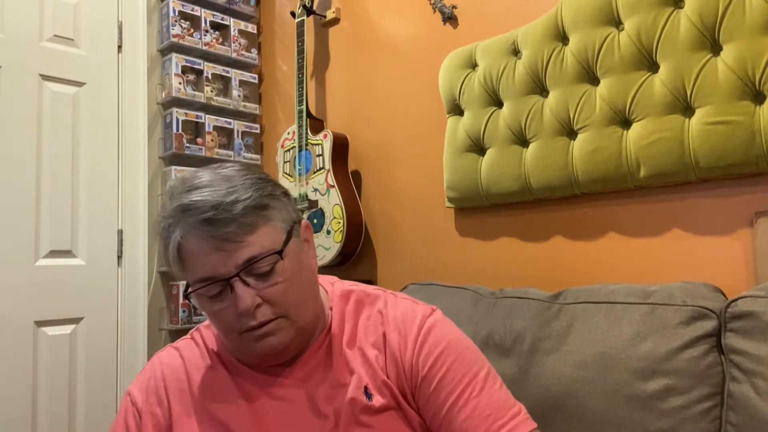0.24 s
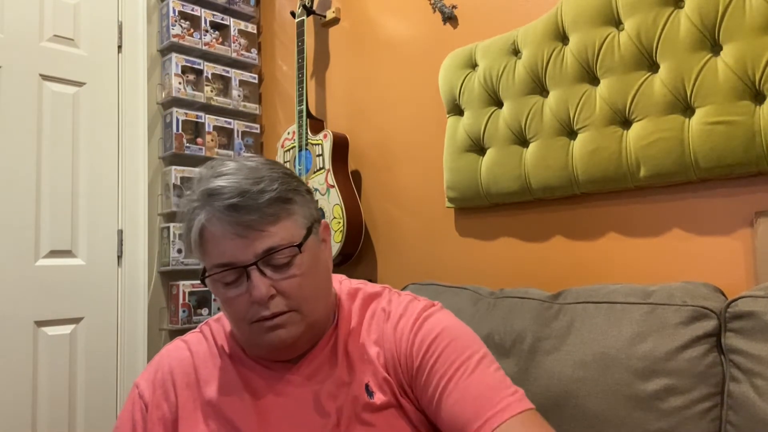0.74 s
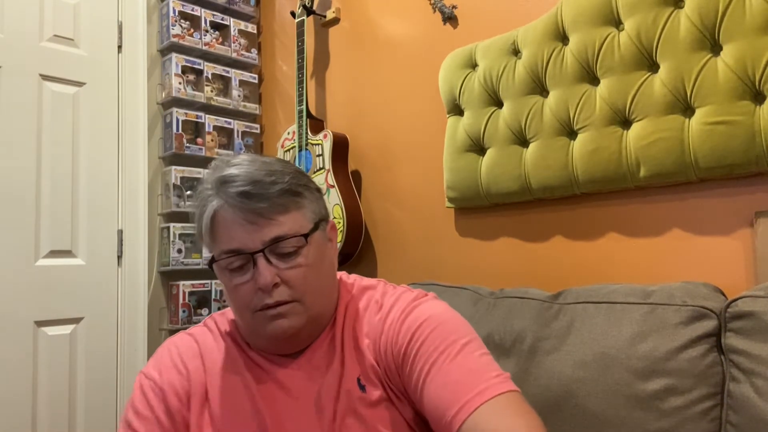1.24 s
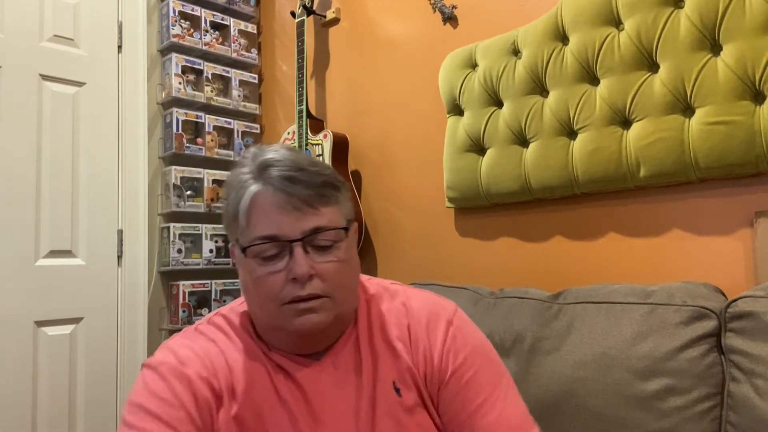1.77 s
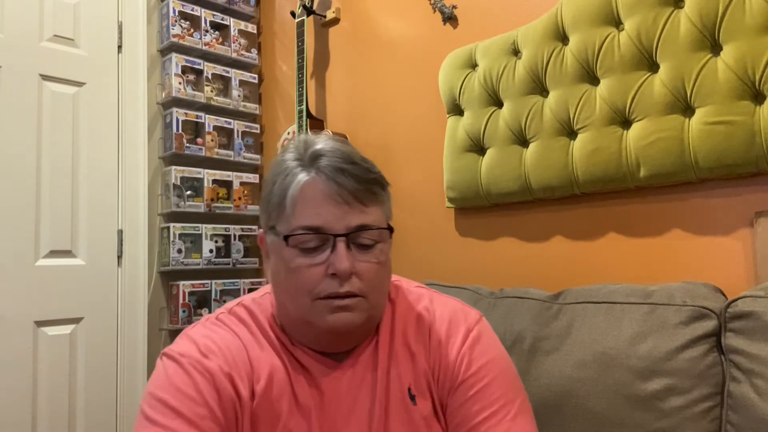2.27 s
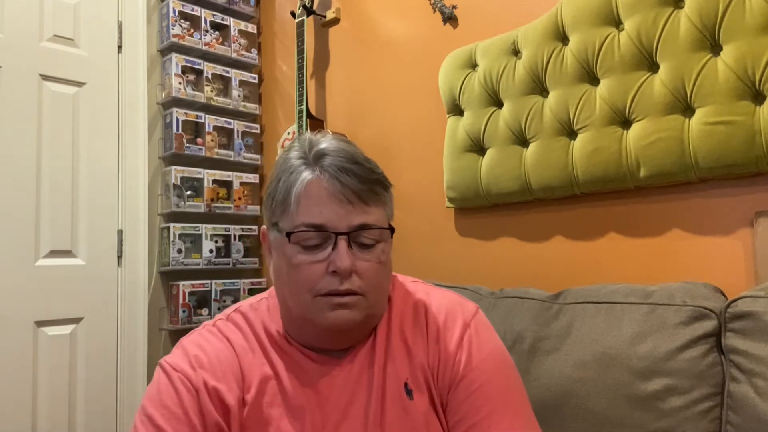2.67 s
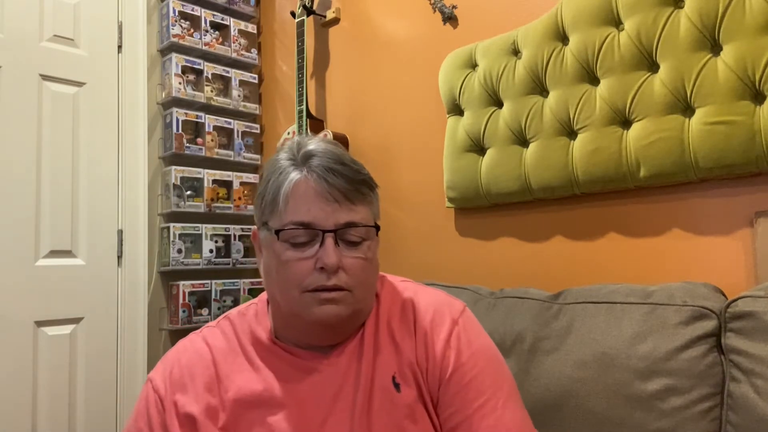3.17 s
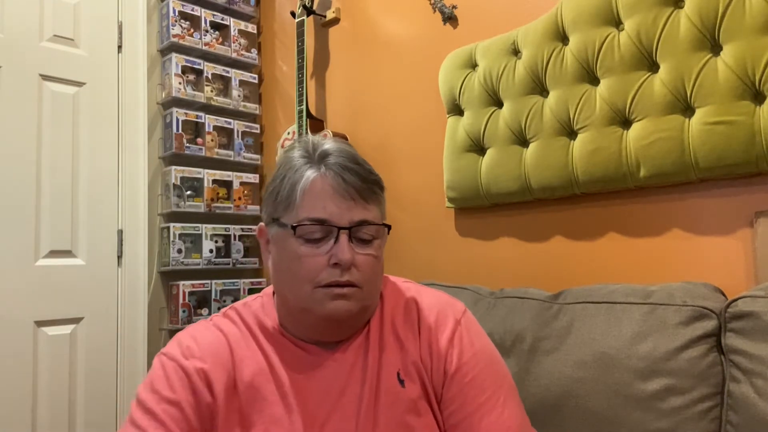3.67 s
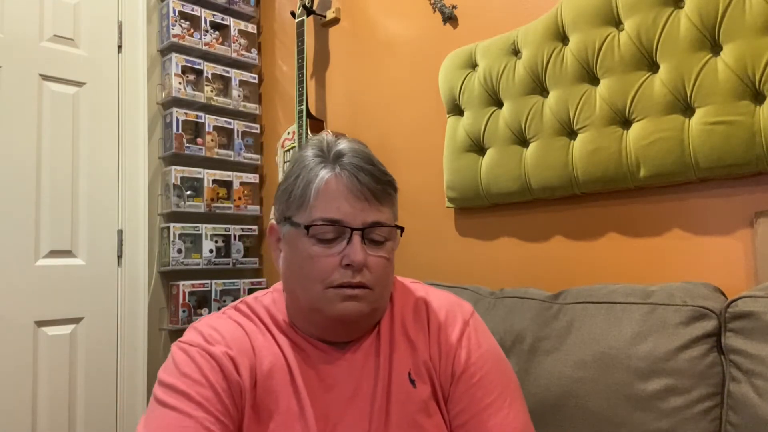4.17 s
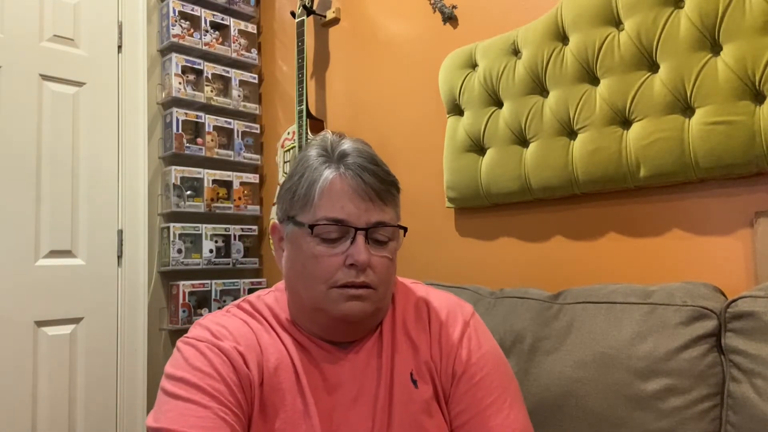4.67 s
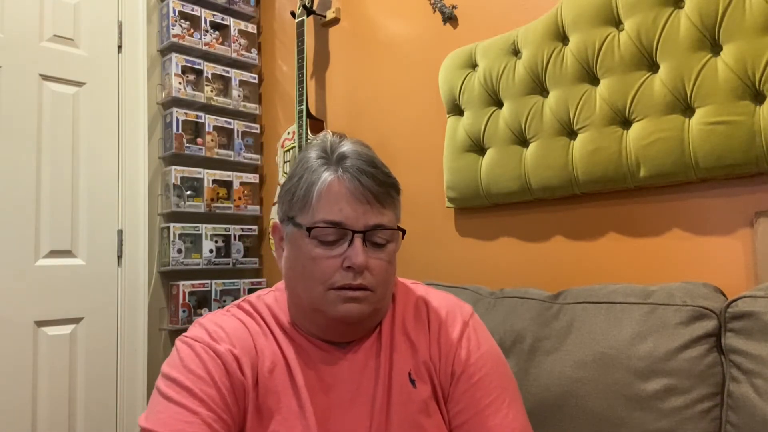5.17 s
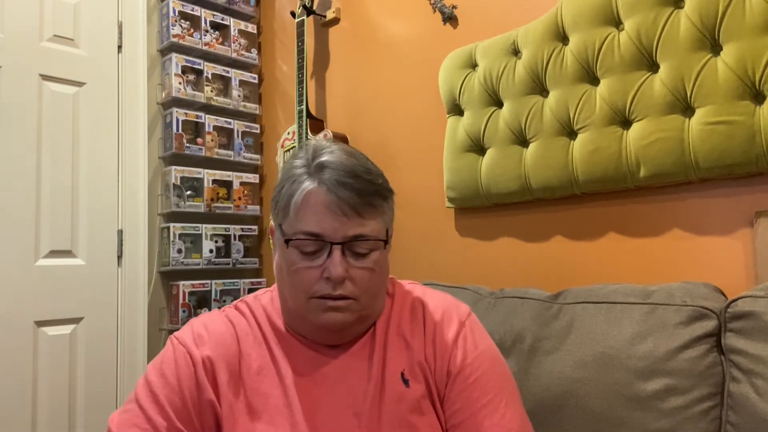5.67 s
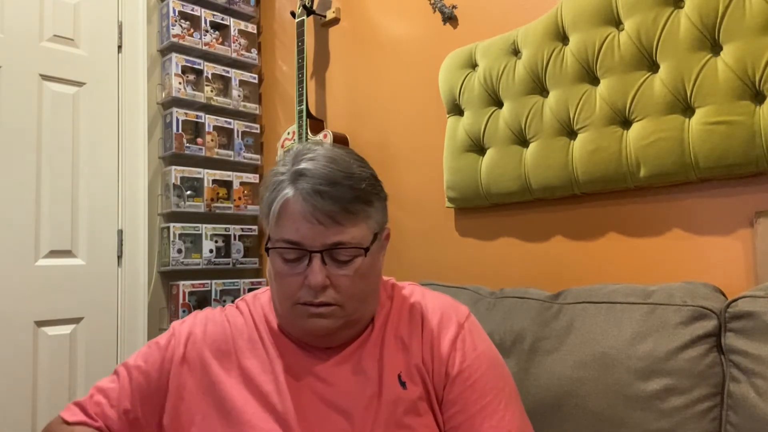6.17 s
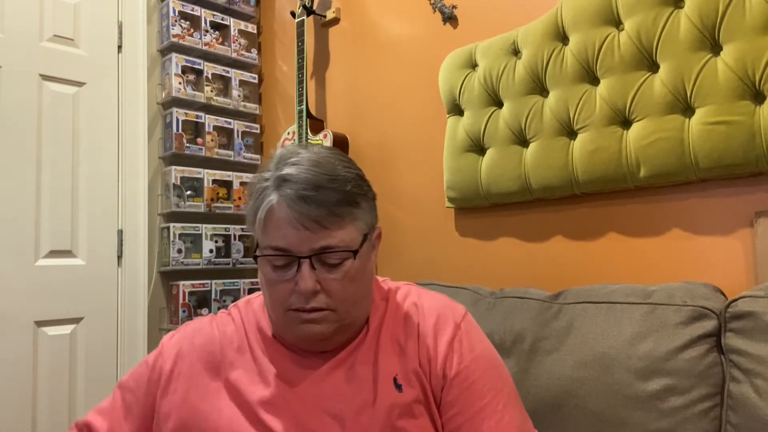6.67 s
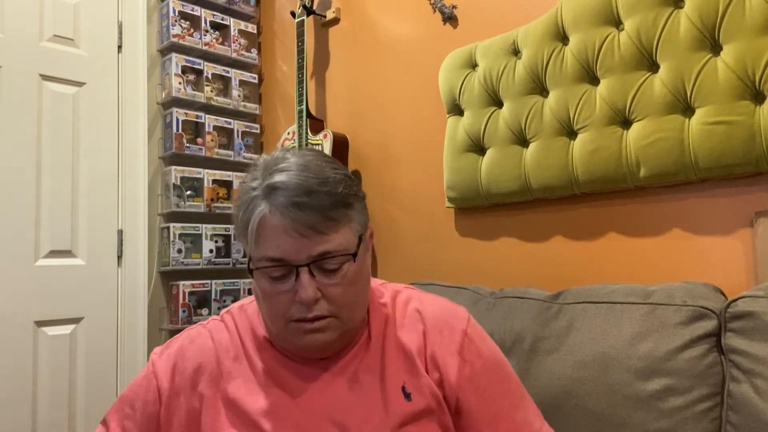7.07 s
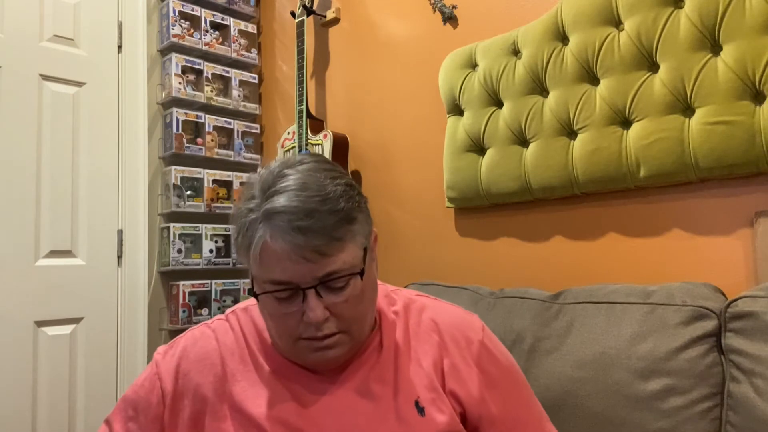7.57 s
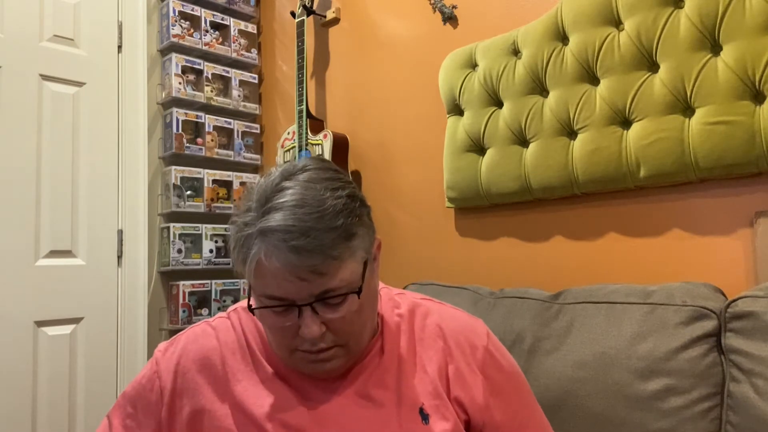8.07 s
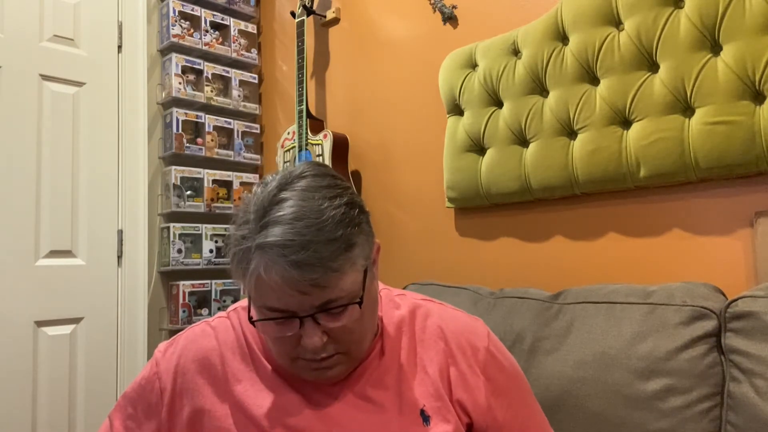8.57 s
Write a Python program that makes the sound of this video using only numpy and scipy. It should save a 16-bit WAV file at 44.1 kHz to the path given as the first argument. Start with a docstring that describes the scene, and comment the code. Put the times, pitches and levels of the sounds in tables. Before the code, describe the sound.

In a small furnished room, hands slide and tap lightly on a cardboard box for about five seconds over a faint low hum. Then packing tape tears away in one loud, crackling pull, the hollow box drumming and jerking beneath it, and lets go with a hard snap and brief flap rattle. Softer rustles and a cluster of cardboard knocks follow. Close stereo microphone, short dry room.

```python
"""Opening a taped cardboard box

Hands slide over a box and knock on it in a small furnished room, then the packing tape tears in one long pull
and lets go with a snap; afterwards the flaps are handled, over a low hum. Tearing and sliding are made of
many tiny random clicks, filtered and passed through resonances. Knocks, jerks and the snap ring the box's
own tones, tape cracks are short noise bursts, and random echoes make the room."""
import sys
import numpy as np
from scipy import signal
from scipy.fft import rfft, irfft, next_fast_len
from scipy.io import wavfile

SR = 44100
rng = np.random.default_rng(int(sys.argv[2]) if len(sys.argv) > 2 else 0)


def materialize(psi):
    """Save the field psi as 16-bit PCM at rate SR to the path in sys.argv[1].

    A 1-D psi becomes a single channel; in a 2-D psi each row is a channel.
    """
    bounded = np.clip(np.atleast_2d(psi).T, -1, 1)
    quanta = np.round(bounded * 32767).astype(np.int16)
    wavfile.write(sys.argv[1], SR, quanta)


N = 389844
TIME = np.arange(N) / SR
RING_TIME = TIME[:SR // 2]
HAND_TIME = TIME[::20]   # coarse time steps for hand movements

# The long pull on the tape. Each row: time in seconds, tearing effort in dB, boom of the lid in dB.
PULL = [(5.04, -41, -80), (5.12, -6, -51), (5.25, -6.5, -47.5), (5.42, -5, -50), (5.47, -3.5, -41.5),
        (5.68, -5, -40.5), (5.8, -0.5, -35), (5.94, 0, -37), (6.05, -1.5, -42), (6.16, -1.5, -51),
        (6.22, -8.5, -62.5), (6.34, -6.5, -67.5), (6.39, -20, -67), (6.5, -24, -62.5)]
# Fingers and flaps knocking on the box. Each row: start in seconds, peak of the body of the knock in dB,
# pitch of the contact in Hz, hardness from 0 to 1, pitch of the clack in Hz.
KNOCKS = [(0.284, -47.5, 1010, 1, 1440), (0.553, -42.5, 355, 1, 1440), (0.582, -43.5, 128, 0.77, 1190),
          (0.979, -45, 400, 0.6, 1000), (1.278, -45, 258, 0.36, 900), (1.346, -50, 380, 0.9, 1300),
          (1.48, -41, 650, 0.74, 1350), (1.625, -42.5, 368, .6, 1100), (1.874, -40, 194, 0, 800),
          (2.158, -45, 550, 0.5, 1000), (2.383, -41, 255, 0.63, 650), (2.446, -41.5, 855, 0.88, 1360),
          (2.579, -44, 700, 0.89, 1230), (2.839, -38.5, 227, 0.67, 600), (2.8895, -27, 317, 0.73, 1350),
          (2.912, -36.5, 340, 0.57, 900), (2.936, -42, 410, 0.8, 900), (3.468, -43, 243, 0.55, 596),
          (3.631, -44.5, 274, 0.62, 605), (3.654, -51, 220, 0.6, 600), (3.998, -51, 330, 0.3, 700),
          (4.105, -45, 226, 0.5, 1110), (4.143, -47, 320, 0.26, 900), (4.165, -48.5, 403, 0.76, 850),
          (4.22, -51.5, 388, 0.87, 1400), (4.244, -51.5, 400, 0.9, 1400), (4.293, -44, 606, .75, 1320),
          (4.319, -52, 400, 0.6, 900), (4.343, -52, 396, .65, 900), (4.36, -48, 400, 0.4, 900),
          (4.377, -52, 330, 0.8, 900), (4.482, -52, 330, 0.6, 600), (4.539, -53, 330, 0.2, 600),
          (4.7, -43.5, 374, 0.27, 705), (4.941, -38, 397, .9, 1450), (6.247, -36, 674, 0.5, 1100),
          (6.33, -28, 425, 0.72, 1410), (6.9104, -45, 1400, 0.9, 1990), (7.337, -43, 258, 0.85, 1250),
          (7.47, -39, 280, 0.72, 1000), (7.516, -42, 300, 0.7, 900), (7.552, -38, 260, .6, 950),
          (7.611, -39, 373, 0.67, 950), (7.698, -41, 370, 0.4, 800), (7.714, -38.5, 400, 0.59, 1100),
          (7.73, -40.5, 203, 0.1, 900), (7.83, -43.5, 280, 0.78, 900), (7.842, -55, 500, 1, 1100),
          (7.869, -38.5, 300, 0.74, 900), (7.906, -42, 280, 0.8, 980), (7.956, -39, 405, 0.69, 880),
          (8.391, -36, 352, 0.77, 1030)]
# Colour of the sideways sound. Each row: frequency in Hz, level in dB.
WIDTH = [(60, -0.5), (250, -3), (600, 3), (1500, 2), (2700, 11), (6000, 6.5), (7500, 7), (9000, -23.5),
         (16000, -26.5)]


def from_db(db):
    """Turn decibels into a gain."""
    return 10 ** (np.asarray(db) / 20)


def rms_one(x):
    """Scale to an rms (average strength) of 1."""
    return x / np.sqrt(np.mean(x ** 2) + 1e-20)


def peak_one(x):
    """Scale to a peak of 1."""
    return x / np.abs(x).max()


def gain_at(points, hz):
    """Read the gain of a colour table at the given frequencies."""
    at, db = np.transpose(points)
    return from_db(np.interp(np.log(hz + 1), np.log(at), db))


def colour(x, points):
    """Filter to the given spectrum without any sound before its cause (minimum phase)."""
    size = 8192
    cepstrum = irfft(np.log(gain_at(points, np.fft.rfftfreq(size, 1 / SR))))
    # folding the second half onto the first puts the response as early as possible
    cepstrum[1:size // 2] *= 2
    cepstrum[size // 2 + 1:] = 0
    response = irfft(np.exp(rfft(cepstrum)))[:size // 2]
    return signal.oaconvolve(x, response)[:len(x)]


def band(x, hz, kind, order=2):
    """Keep one range of frequencies with a Butterworth filter."""
    return signal.sosfilt(signal.butter(order, hz, kind, fs=SR, output="sos"), x + 1e-18)


def drift(per_s):
    """Wander by chance with an rms of 1, through per_s random points a second."""
    knots = rng.standard_normal(N // 20)
    return rms_one(np.interp(TIME * min(per_s, SR / 21), np.arange(len(knots)), knots))


def add(track, s, sound):
    """Mix a sound into the track at time s."""
    start = int(s * SR)
    track[start:start + len(sound)] += sound[:N - start]


def slips(per_s, spread_db, clump_db, clumps_per_s):
    """Fibres and glue threads let go: clicks of uneven size whose loudness swells in clumps."""
    born = rng.random(N) < per_s / SR
    sizes_db = spread_db * np.minimum(rng.exponential(1, N), 5)
    sizes = from_db(sizes_db) * rng.choice([-1, 1], N)
    return born * sizes * from_db(clump_db * drift(clumps_per_s))


def resonance(x, hz, width_hz):
    """Ring a resonance whose centre follows the curve hz, scaled to an rms of 1."""
    # shift the centre down to 0 Hz, smooth there, then shift back up
    turn = np.exp(2j * np.pi * np.cumsum(hz) / SR)
    smooth = signal.lfilter([1], [1, -np.exp(-np.pi * width_hz / SR)], x / turn)
    return rms_one((turn * smooth).real)


def tearing():
    """The tape gives way thread by thread; the same slips crackle in the film and drum on the box."""
    # How the voices follow the effort, in the order box drone, panel bark, strip rasp, tape fizz.
    # Each row: level in dB at an effort of 0 dB (before any lid share), dB of change per dB of effort.
    voices = [(-38.5, 0.46), (-44, 0.47), (-48, 3), (-45, 0.78)]
    # Colours of the box's deep boom, its drone and its bark, and of the tape's fizz.
    # Each row: frequency in Hz, level in dB.
    boom_colour = [(30, -43.5), (110, -20), (190, -5), (265, 4.5), (360, 6.5), (450, -8), (700, -13.5),
                   (2000, -55)]
    drone_colour = [(30, -25.5), (65, -3), (100, 4), (165, 1), (260, -4.5), (400, -7.5), (500, 5.5),
                    (690, 0.5), (780, 0.5), (900, -15.5), (1300, -17), (2500, -36.5)]
    bark_colour = [(700, -30.5), (920, -9.5), (1130, 3), (1400, 4), (1600, 1), (1780, -4), (2000, -1),
                   (3000, -4.5), (6000, -11.5)]
    fizz_colour = [(1200, -2.5), (2200, -1), (3200, -2.5), (4500, -0.5), (6500, -4.5), (8000, -1),
                   (11000, -2), (13000, -5.5), (15500, -7)]
    s, effort_db, boom_db = np.transpose(PULL)
    effort, boom_gain = (np.interp(TIME, s, from_db(db), left=0, right=0) for db in (effort_db, boom_db))
    drone_gain, bark_gain, rasp_gain, fizz_gain = (from_db(db) * effort ** slope for db, slope in voices)

    tugs = slips(per_s=600, spread_db=1.5, clump_db=1.5, clumps_per_s=160)
    threads = slips(per_s=5100, spread_db=2.0, clump_db=2.0, clumps_per_s=110)
    film = rms_one(tugs) + from_db(5) * rms_one(threads)   # fine threads 5 dB above the coarse tugs
    panels = signal.oaconvolve(tugs, box_ring(scatter_db=3))[:N]
    boom, drone, bark = (rms_one(colour(panels, shade)) for shade in (boom_colour, drone_colour, bark_colour))
    rasp, fizz = strip_ring(tugs), rms_one(colour(film, fizz_colour))

    # drone and bark also follow 0.32 of the lid's boom in dB, fading as the tear moves off the lid
    on_lid = peak_one(boom_gain) ** 0.32
    on_box = boom_gain * boom + on_lid * (drone_gain * drone + bark_gain * bark)
    return on_box + rasp_gain * rasp + fizz_gain * fizz


def strip_ring(x):
    """The free strip lengthens and flexes during the pull, so its resonances wander, swell and fade."""
    # Resonances of the stretched strip of tape. Each row: middle frequency in Hz, average level in dB.
    strip = [(1400, 1), (1800, 5), (2180, -3), (2700, -4), (3060, 0.5), (3500, -3.5), (4100, 2), (4500, -1),
             (4980, -0.5), (5900, -9.5)]
    width_hz, wander_share, sway_db = 115, 0.016, 4
    out, pull = np.zeros(N), slice(int(PULL[0][0] * SR), int(PULL[-1][0] * SR))
    for hz, db in strip:
        centre_hz = hz * (1 + wander_share * drift(13)[pull])
        level = from_db(db + sway_db * drift(25)[pull])
        out[pull] += level * resonance(x[pull], centre_hz, width_hz)
    return out / out[pull].std()


def box_ring(scatter_db, bending_s=0.003036):
    """The box answers a tap; bending waves carry the treble first, so the pitch drops at once."""
    # Tones of the air inside and of the panels. Each row: frequency in Hz, average level in dB,
    # time to fade by 60 dB in seconds.
    modes = [(102.5, -3.5, 0.085), (169, -26.5, 0.043), (262.8, -6.5, 0.043), (309.3, -7, 0.047),
             (358.4, -5, 0.036), (434.6, -9.5, .05), (492.6, -6.5, 0.055), (619, -2, 0.035),
             (655, -10.5, 0.058), (912, -11.5, 0.05), (1052, -12.5, 0.044), (1362, -3, 0.018),
             (1516, -1.5, .025), (1767, -4.5, 0.027)]
    hz, db, t60 = np.transpose(modes)[:, :, None]
    t = RING_TIME[:SR // 5]
    strength_db = db + scatter_db * rng.standard_normal(hz.shape)
    # bending_s is the delay of a 300 Hz tone; higher tones start earlier
    age = np.maximum(t - bending_s * np.sqrt(300 / hz), 0)
    return np.sum(from_db(strength_db - 60 * age / t60) * np.sin(2 * np.pi * hz * age), axis=0)


def blows(rows, bending_s, scatter_db, crumple_db, crumple_s, clack_s, crackle_db, crackle_s, body_spread):
    """A broad push thumps the air in the box; a hard edge makes the panel under it clack and crackle."""
    out = np.zeros(N)
    clack_spread = 1.313   # a clack spans this ratio above and below its pitch
    crunch_per_s = 700     # corrugations giving way under a blow
    for s, db, contact_hz, thump_db, clack_db, clack_hz in rows:
        ring = peak_one(box_ring(scatter_db, bending_s))
        t = TIME[:len(ring)]
        body_band = [contact_hz / (1 + body_spread), contact_hz * (1 + body_spread)]
        clack_band = [clack_hz / clack_spread, clack_hz * clack_spread]
        # the corrugations crunch briefly under the blow, and a few give way one by one
        crunchy = ring + from_db(crumple_db) * rng.standard_normal(len(t)) * np.exp(-t / crumple_s)
        gives_way = rng.random(len(t)) < crunch_per_s / SR
        buckles = rng.standard_normal(len(t)) * gives_way * np.exp(-t / crackle_s)

        thump = peak_one(band(ring, [55, 135], "band"))
        body = peak_one(band(crunchy, body_band, "band"))
        clack = peak_one(band(crunchy * np.exp(-t / clack_s), clack_band, "band"))
        clack += from_db(crackle_db) * peak_one(band(buckles, clack_band, "band"))
        add(out, s, from_db(db) * (body + from_db(thump_db) * thump + from_db(clack_db) * clack))
    return out


def snap():
    """The last strand parts, and the flaps spring free and rattle as a run of blows."""
    # Blows before colouring. Each row: start in seconds, peak of the body in dB, pitch of the contact in Hz,
    # thump in dB against that peak, clack in dB against that peak, pitch of the clack in Hz.
    rows = [(6.522, -35.5, 480, -14.5, -11, 1500), (6.5465, -8.5, 586, -24.5, -15.5, 1200),
            (6.5525, -20.5, 1046, -20, 7.5, 1850), (6.556, -18, 475, 0, -12.5, 1000),
            (6.574, -26.5, 590, -12, -15, 900), (6.59, -29, 480, -15.5, -10, 1004),
            (6.622, -37.5, 453, -15, -13, 900)]
    # Colour of the force. Each row: frequency in Hz, level in dB.
    force = [(30, -11.5), (70, -1.5), (150, 4.5), (280, 1), (500, 1.5), (650, 1), (950, 3), (1400, -2.5),
             (1800, 5.5), (2600, -12.5), (8000, -13)]
    rattle = blows(rows, bending_s=0.00092, scatter_db=7.5, crumple_db=-16.0, crumple_s=0.014,
                   clack_s=0.017, crackle_db=-14.5, crackle_s=0.025, body_spread=0.38)
    return colour(rattle, force)


def shudder(rise_s=0.0048, decay_s=0.039):
    """After the snap the loose flaps chatter against the box and settle: a noise burst that dies away."""
    # Colour of the chatter. Each row: frequency in Hz, level in dB.
    chatter_colour = [(30, -16), (70, 6), (160, 2.5), (260, -1.5), (480, -1), (700, -4.5), (1050, -1.5),
                      (1500, -14), (2500, -15), (6000, -24)]
    out = np.zeros(N)
    chatter = rms_one(colour(rng.standard_normal(len(RING_TIME)), chatter_colour))
    envelope = np.exp(-RING_TIME / decay_s) * (1 - np.exp(-RING_TIME / rise_s))
    add(out, 6.556, from_db(-28.5) * chatter * envelope)
    return out


def jerks():
    """The tape catches and jerks the lid, each time striking the box's tones."""
    # Each row: start in seconds, peak of the body in dB, pitch of the contact in Hz,
    # clack in dB against that peak.
    catches = [(5.116, -34.5, 350, -14), (5.132, -42, 445, -1), (5.263, -42, 395, 2),
               (5.284, -30.5, 220, -9), (5.345, -36.5, 380, -13.5), (5.434, -33, 458, -12),
               (5.46, -38, 477, -1), (5.505, -33.5, 520, -11), (5.552, -32, 383, -8),
               (5.592, -28.5, 252, -14), (5.718, -27, 317, -19), (5.753, -24, 336, -9),
               (5.795, -17, 305, -14.5), (5.817, -19, 290, -13), (5.862, -23, 321, -22),
               (5.927, -21, 337, -14), (5.948, -22.5, 323, -15)]
    thump_db, clack_hz = -24, 1590
    rows = [(s, db, hz, thump_db, clack_db, clack_hz) for s, db, hz, clack_db in catches]
    return blows(rows, bending_s=0.00338, scatter_db=0.0, crumple_db=0.0, crumple_s=0.012,
                 clack_s=0.002, crackle_db=-5, crackle_s=0.015, body_spread=0.26)


def by_hardness(soft_and_hard_db, hardness):
    """Pick a level between that of a soft and that of a hard blow."""
    return np.interp(hardness, [0, 1], soft_and_hard_db)


def knocks():
    """Fingers and flaps knock on the box; soft ones thump more and hard ones clack more."""
    thump_db, clack_db = (3.5, -14.5), (-30.5, 4.5)   # soft and hard, against the peak of the body
    rows = [(s, db, hz, by_hardness(thump_db, hardness), by_hardness(clack_db, hardness), clack_hz)
            for s, db, hz, hardness, clack_hz in KNOCKS]
    return blows(rows, bending_s=0.00203, scatter_db=7.0, crumple_db=-4, crumple_s=0.024,
                 clack_s=0.0027, crackle_db=-7.5, crackle_s=0.018, body_spread=0.38)


def crack_events():
    """List the single cracks, and the crack that each knock sets off in the tape."""
    # Tape film cracking. Each row: start in seconds, level in dB, lower treble in dB, top treble in dB;
    # cracks() adds a fixed trim to the level and to the top treble.
    single = [(0.2265, -56, -7, -2), (0.2857, -44, 5.5, -10), (0.302, -46, 6, -5), (0.529, -50, -10, 0),
              (0.5528, -35.5, -6, 2.5), (0.5829, -38, -7, -0.5), (1.08, -48, -2, -4),
              (4.7277, -50, -3.5, -32), (4.9388, -33, -12, -6), (4.9848, -42.5, -6, -7),
              (5.46, -38, -6, -5), (5.55, -55, -10, -1), (5.573, -51, -14, 1), (6.884, -57, -12, 5),
              (6.33, -28, -3, -7.5), (6.4558, -49, 0.5, -21), (6.5476, -14, -16, -6),
              (6.5526, -16, -8, -15), (6.7075, -41.5, -5, -14), (6.9094, -53, 4.5, 2),
              (7.3367, -41, -4.5, -14), (7.715, -52, 3, 1), (7.757, -49, -6, -5), (7.7766, -44.5, -8, -7),
              (7.8228, -43, -8, -9), (7.8445, -48.5, -1, -8), (7.907, -54, -7, -10),
              (7.9227, -48.5, -6, -4), (8.0596, -56, -7.5, -5)]
    soft_and_hard_db, low_db, top_db = (-27, -16), -0.5, -7   # the first against the peak of the knock
    knocked = [(s, db + by_hardness(soft_and_hard_db, hardness), low_db, top_db)
               for s, db, _, hardness, _ in KNOCKS]
    return single + knocked


def cracks(decay_s=0.00084, flutter_db=-19, flutter_s=0.0095, rise_s=0.0011):
    """The stiff film cracks in about a millisecond and flutters a little after."""
    # Colour of a crack. Each row: frequency in Hz, level in dB.
    crack_colour = [(600, -15.5), (1500, -12), (2800, -9), (4000, -8), (5800, 7.5), (7200, 4), (9000, 3.5),
                    (12000, -2), (16000, -2)]
    out, t = np.zeros(N), RING_TIME[:SR // 20]
    fading = np.exp(-t / decay_s) + from_db(flutter_db) * np.exp(-t / flutter_s)
    envelope = fading * (1 - np.exp(-t / rise_s))
    treble_bands = ([1000, 3800], [4000, 8500], [8800, 17000])
    for s, db, low_db, top_db in crack_events():
        burst = colour(rng.standard_normal(len(t)) * envelope, crack_colour)
        low, main, top = (rms_one(band(burst, hz, "band", order=3)) for hz in treble_bands)
        # the bands have an rms of 1, so fixed trims set the overall and the top level
        add(out, s, from_db(db - 16.5) * (main + from_db(low_db) * low + from_db(top_db + 6.5) * top))
    return out


def stroke_envelope(start, length):
    """A hand gathers speed, slides on and comes to rest."""
    rise_share, release_s = 0.39, 0.045
    rise = np.clip((HAND_TIME - start) / (rise_share * length), 0, 1)
    release = np.exp(-np.clip((HAND_TIME - start - length) / release_s, 0, 20))
    return np.sin(np.pi / 2 * rise) * release


def scrape():
    """Fingertips catch on the ribs of the board, each ringing its own pitch range in uneven clumps."""
    # Edges between neighbouring pitch ranges, in Hz.
    edges_hz = [200, 620, 950, 1400, 2100, 9000]
    out = np.zeros(N)
    for low, high in zip(edges_hz, edges_hz[1:]):
        catches = rms_one(slips(per_s=750, spread_db=1.8, clump_db=3.2, clumps_per_s=45))
        out += band(catches, [low, high], "band", order=3)
    return out


def rubbing():
    """Skin and sleeves slide on the board: panels murmur, paper rasps, the surface hisses, tape swishes."""
    # Hands sliding: dull on bare board, bright on smooth tape, hollow over the middle of a panel.
    # Each row: start in seconds, length in seconds, level in dB, brightness in dB, hollowness in dB.
    strokes = [(0, 0.0067, -62.5, -1.5, -9), (0.265, 0.046, -48, -0.5, -8.5), (0.307, 0.27, -56.5, 3, -2),
               (0.502, 0.15, -48.5, 2, -13), (0.692, 0.069, -56.5, 4.5, -3), (0.78, 0.14, -57.5, 1.5, -5),
               (0.923, .11, -51, -0.5, -1.5), (1.054, 0.17, -53.5, -3, -13), (1.239, 0.13, -56.5, -1.5, 1),
               (1.277, 1, -53.5, -0.5, -3), (1.403, 0.097, -53.5, 4.5, -5), (1.533, 0.18, -55.5, 5, -12),
               (1.629, 0.085, -50.5, 5, -22), (1.81, 0.077, -51, 5.5, -1), (1.883, 0.17, -51.5, -4, -9),
               (2.025, 0.062, -54.5, 4.5, -1), (2.117, 0.089, -49, 4, -4.5), (2.22, 0.13, -61, 0.5, 2.5),
               (2.337, 0.2, -63.5, 1, 5), (2.54, 0.18, -58.5, 1.5, -8), (2.729, 0.18, -54.5, 0, 0.5),
               (2.865, 0.14, -60.5, 0, 2), (3.027, 0.07, -51.5, 2, -5), (3.044, 0.22, -52.5, -2.5, -2),
               (3.295, 0.41, -67.5, -3.5, -0.5), (3.761, 0.092, -60.5, 1.5, 4.5),
               (3.787, 0.22, -62.5, 4, 1), (3.998, 0.12, -64.5, -3.5, -19), (4.076, 0.27, -62.5, -32, -0.5),
               (4.387, 0.33, -77, -16, -9), (4.68, 0.65, -62.5, -7, -0.5), (4.891, 0.11, -54, -3.5, 0),
               (4.98, 0.4, -54, 5, -7), (6.6, .22, -68.5, 0, 6.5), (6.77, 0.14, -53.5, -4, -5.5),
               (6.897, 0.086, -50.5, 1, -7), (7.005, 0.11, -53.5, -1.5, -1), (7.084, 0.26, -54, 0, -3),
               (7.365, 0.57, -68, -0.5, 7.5), (7.43, 0.16, -62.5, 2, 3.5), (7.68, 0.043, -59, -0.5, 8.5),
               (7.979, 0.62, -72, 2, 6), (8.219, 0.27, -61, 0.5, -1.5), (8.485, 0.21, -66.5, -1.5, -15),
               (8.655, 0.4, -52.5, -1, -3)]
    # Colours of the four layers. Each row: frequency in Hz, level in dB.
    murmur_colour = [(40, -43), (70, 15.5), (150, 5.5), (350, 2), (750, 0.5), (1100, -8), (2500, -25.5)]
    rasp_colour = [(300, -24.5), (750, -7.5), (1050, 0.5), (1450, 0), (1900, -2), (2600, -7.5), (5000, -24),
                   (16000, -69)]
    hiss_colour = [(800, 5.5), (2000, -4.5), (3500, 5.5), (5000, 4.5), (7000, 7), (11000, 4.5), (15500, 0)]
    swish_colour = [(2000, -5.5), (4000, -27.5), (7000, -9), (9500, 4), (12000, 2.5), (15500, 0.5)]
    start, length, db, bright_db, hollow_db = np.transpose(strokes)
    # murmur, rasp, hiss, swish; the swish gains 2.8 dB for each dB of brightness
    layer_db = [db + hollow_db, db - 6.5, db - 5 + bright_db, db - 9.5 + 2.8 * bright_db]
    envelopes = np.array([stroke_envelope(*span) for span in zip(start, length)])
    # overlapping strokes add up in power
    layer_gains = np.sqrt(from_db(layer_db) ** 2 @ envelopes ** 2)
    murmur_gain, rasp_gain, hiss_gain, swish_gain = (np.interp(TIME, HAND_TIME, g) for g in layer_gains)

    palm = slips(per_s=900, spread_db=1.8, clump_db=2.5, clumps_per_s=60)
    surface = slips(per_s=18000, spread_db=2.5, clump_db=2.5, clumps_per_s=43)
    tape = slips(per_s=27000, spread_db=2.0, clump_db=-0.5, clumps_per_s=92)
    murmur, rasp = rms_one(colour(palm, murmur_colour)), rms_one(colour(scrape(), rasp_colour))
    hiss, swish = rms_one(colour(surface, hiss_colour)), rms_one(colour(tape, swish_colour))
    return murmur_gain * murmur + rasp_gain * rasp + hiss_gain * hiss + swish_gain * swish


def squeals():
    """Quick slips ring a resonance that glides as the contact moves, swelling and fading."""
    # A finger or the tape drags and briefly sings: a squeal when narrow, a scuff when wide.
    # Each row: start in seconds, length in seconds, level in dB, first pitch in Hz, last pitch in Hz,
    # half the width in Hz of each of the two resonances in a row.
    drags = [(0.942, .13, -54.5, 380, 300, 200), (.95, 0.12, -57.5, 900, 1250, 400),
             (1.07, 0.14, -54.5, 1580, 1350, 376), (1.234, 0.13, -57.5, 1200, 1150, 350),
             (1.43, 0.13, -59, 1150, 1400, 400), (1.595, 0.07, -51, 430, 380, 200),
             (2.07, 0.19, -53.5, 700, 760, 398), (2.813, 0.024, -61, 1500, 1100, 700),
             (5.845, .12, -46, 10400, 10900, 900), (5.908, 0.22, -52.5, 4760, 4900, 160),
             (6.016, 0.044, -43, 2950, 3060, 450), (6.319, 0.048, -49.5, 2500, 2320, 450),
             (6.7063, 0.0047, -38.5, 4900, 4670, 1100), (6.89, 0.082, -62, 1540, 1100, 500),
             (7.026, 0.078, -56.5, 567, 705, 250)]
    out, grip = np.zeros(N), slips(per_s=2300, spread_db=2.5, clump_db=1.0, clumps_per_s=300)
    for s, length, db, first_hz, last_hz, half_width_hz in drags:
        start, n = int(s * SR), int(length * SR)
        hz = np.linspace(first_hz, last_hz, n)
        once = resonance(grip[start:start + n], hz, 2 * half_width_hz)
        tone = resonance(once, hz, 2 * half_width_hz)
        add(out, s, from_db(db) * tone * np.sin(np.linspace(0, np.pi, n)))
    return out


def room_tone(air_db=-59, hum_hz=99, hum_db=-63, side_db=-8):
    """Filtered noise makes a low rumble and faint hiss; a sine wavering in phase and level makes a hum."""
    # Colour of the room's air. Each row: frequency in Hz, level in dB.
    air_colour = [(20, -25.5), (32, -16.5), (45, 6.5), (65, -14), (100, 6.5), (150, -3), (250, -10.5),
                  (500, -22), (1000, -39.5), (2500, -38.5), (6000, -38.5), (15500, -43.5)]
    mid, side = (rms_one(colour(rng.standard_normal(N), air_colour)) for _ in range(2))
    air = mid + from_db(side_db) * colour(side, WIDTH) * [[1], [-1]]
    hum = np.sin(2 * np.pi * hum_hz * TIME + 1.0 * drift(8.3)) * from_db(1.4 * drift(2.8))
    return from_db(air_db) * air + from_db(hum_db) * hum


def reflections(t60, delay_s):
    """Make a dying cloud of random echoes with a total energy of 1; t60 is its 60 dB fade in seconds."""
    fading = 1000 ** (-RING_TIME / t60)
    cloud = rng.standard_normal(len(RING_TIME)) * fading * (RING_TIME > delay_s)
    return cloud / np.linalg.norm(cloud)


def room(x, tail_db, near_db):
    """Nearby surfaces spread the sound sideways at once; the walls add a short tail."""
    tail, side_tail = (from_db(tail_db) * reflections(t60=0.29, delay_s=0.014) for _ in range(2))
    wide = from_db(near_db) * reflections(t60=0.051, delay_s=0.0015) + side_tail
    mid = x + signal.oaconvolve(x, tail)[:N]
    side = signal.oaconvolve(x, colour(wide, WIDTH))[:N]
    return mid + side * [[1], [-1]]


def scene():
    """The box's blows get a weaker room tail; the bright sounds of tape and hands get a stronger one."""
    surface = room(tearing() + cracks() + rubbing() + squeals(), tail_db=-13.0, near_db=-12.0)
    box = room(snap() + shudder() + jerks() + knocks(), tail_db=-19.0, near_db=-10.5)
    return surface + box + room_tone()


def record(dry):
    """The two microphone channels part in phase towards the treble; deep bass and top are cut."""
    # Phase between the channels. Each row: frequency in Hz, lead of the left channel in radians.
    ports = [(0, 0), (550, -.4), (1800, -.7), (2800, -1.2), (4000, .3), (6500, .5), (7900, 1.8),
             (9200, 3.14), (11950, 6.28), (14700, 9.42), (16500, 10.6)]
    size = next_fast_len(N + SR)
    lead = np.interp(np.fft.rfftfreq(size, 1 / SR), *np.transpose(ports))
    # half of the lead goes to each channel, in opposite directions
    pair = irfft(rfft(dry, size) * np.exp(.5j * lead * [[1], [-1]]), size)[:, :N]
    # the left channel is raised and the right one lowered by 0.13 dB
    pair = band(pair, 27, "high", order=3) * from_db(0.13 * np.array([[1], [-1]]))
    cutoff_hz = 15900
    return signal.sosfilt(signal.ellip(10, .1, 80, cutoff_hz, fs=SR, output="sos"), pair)


dry = scene()
out = record(dry)
materialize(out)
```